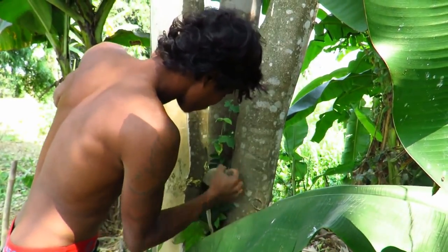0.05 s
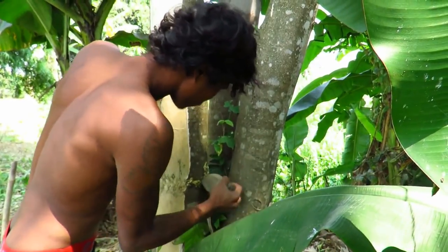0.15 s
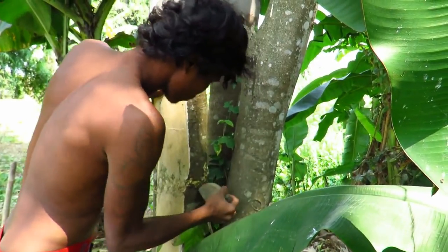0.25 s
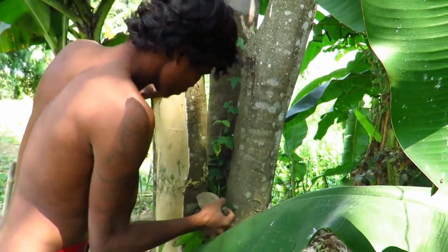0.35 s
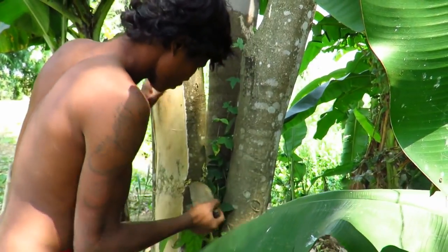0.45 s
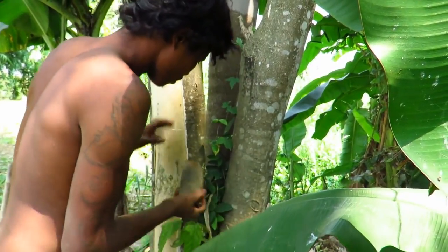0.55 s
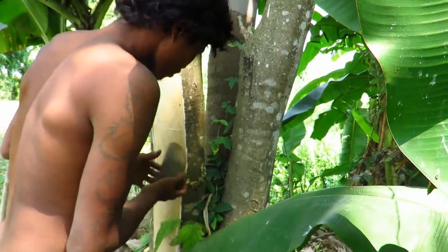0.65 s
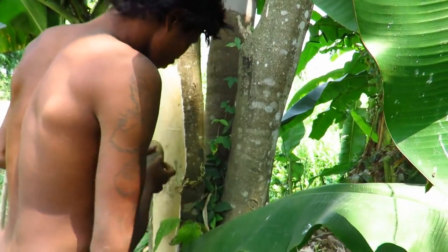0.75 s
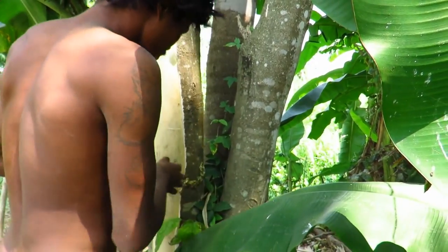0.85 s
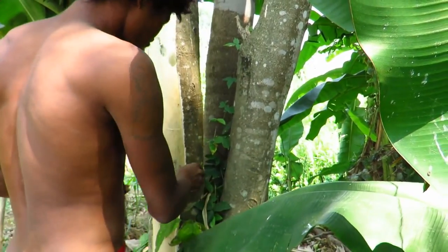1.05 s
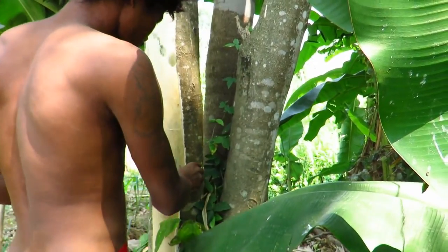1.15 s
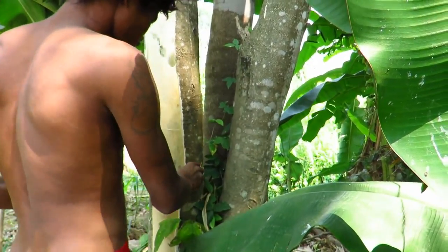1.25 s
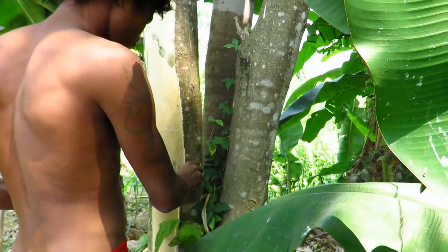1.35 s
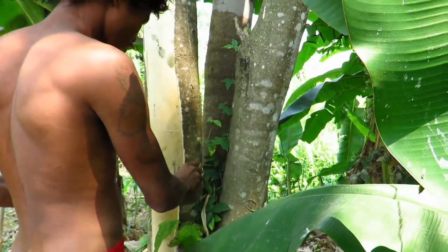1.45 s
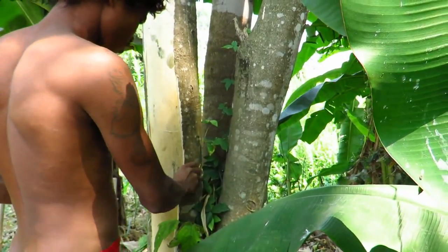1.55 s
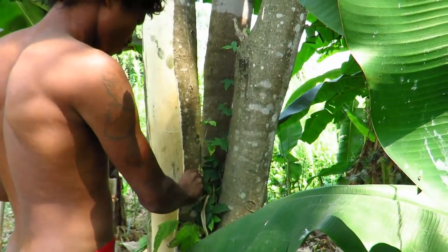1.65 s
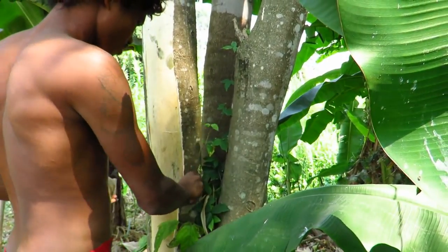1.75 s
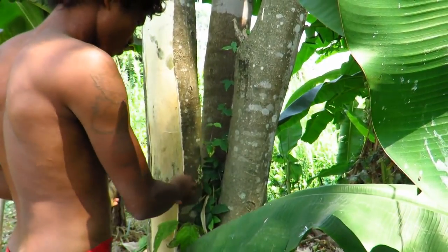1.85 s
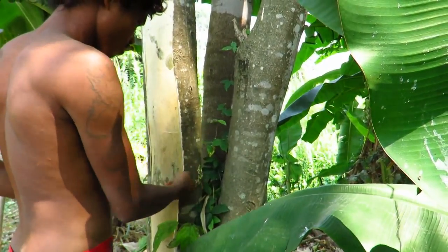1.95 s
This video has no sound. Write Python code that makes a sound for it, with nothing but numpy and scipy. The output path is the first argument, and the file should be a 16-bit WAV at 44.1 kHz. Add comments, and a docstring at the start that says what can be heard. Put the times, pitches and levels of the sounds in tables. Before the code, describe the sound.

Close to the microphone, one loud blunt chop thuds on wood and echoes briefly off trees; quieter gritty bark scraping with tiny snaps follows, then only hushed leaves, thin insect hiss and a light rustle.

```python
"""One blunt blow on a slim trunk in a forest, heard close up: decaying tones ring and noise cracks.
Then a hand scrapes and peels the bark in short pulls: grainy noise with small ringing snaps.
Echo off the trees follows the crack. Behind it all lie soft leaf noise, a band of insect song and
one bright rustle of leaves. A limiter turns everything down for the blow and then lets go."""
import sys
import numpy as np
from scipy import signal
from scipy.fft import rfft, irfft, next_fast_len
from scipy.io import wavfile
from scipy.ndimage import uniform_filter1d, minimum_filter1d

SR = 44100
rng = np.random.default_rng(int(sys.argv[2]) if len(sys.argv) > 2 else 0)


def store_pcm(level_fs):
    """Save levels as 16-bit WAV."""
    pcm = np.round(np.clip(level_fs, -1, 1) * 32767).astype(np.int16)
    wavfile.write(sys.argv[1], SR, np.atleast_2d(pcm).T)


N = 85995

# All levels are relative, ahead of the limiter; t60 is the time to fade by 60 dB.
# The blow and small rebounds of the tool. Each row: start in seconds, level in dB, contact time in seconds.
BLOWS = [(0.2077, 7.5, 0.0017), (0.2226, -15, 0.00063), (0.2373, -10.5, 0.0056), (0.2556, -11.5, 0.0053)]
# Ringing tones of the trunk. Each row: frequency in Hz, level in dB, t60 in seconds.
TRUNK_TONES = [(80.7, -11, 0.21), (100, -20, 0.13), (151.1, -25.5, .5), (197, -5, 0.19), (299.4, 9, 0.06),
               (249.7, 6, 0.084), (341, -18, 0.1), (396, -5, 0.055), (584.5, -6, 0.087), (638.8, -2, 0.066),
               (787, -2, 0.031), (1080, -23, 0.097), (1584, 0, 0.019), (3580, -19, .02)]
# Colour of the splintering fibres. Each row: frequency in Hz, level in dB per Hz.
CRACK_COLOUR = [(590, -33), (1000, 4), (2010, -8.5), (3700, -5.5), (6410, -22), (11200, -12),
                (14600, -23.5), (15500, -22)]
# Hand on bark. Each row: time in seconds, scrape level in dB, low rub level in dB, treble level in dB.
SCRAPE_LEVELS = [(0.44, -73, -64, -86), (0.476, -56.5, -56, -81), (0.506, -44, -52, -57),
                 (0.528, -46.5, -49, -60), (0.548, -42.5, -45, -60), (0.556, -45, -50, -58),
                 (0.624, -45.5, -50, -53), (0.632, -43.5, -33, -49), (0.644, -36, -43, -52),
                 (0.672, -36, -37.5, -45), (0.696, -39.5, -55, -51), (0.702, -38.5, -45.5, -50),
                 (0.722, -53.5, -51, -60), (0.74, -46.5, -49, -58), (0.76, -42, -82, -56),
                 (0.766, -59, -75, -60), (0.768, -52, -77, -59), (0.79, -45.5, -47, -60),
                 (0.826, -54.5, -61, -66), (0.846, -37, -47, -48), (0.858, -49, -45, -59),
                 (0.864, -47.5, -52, -57), (0.894, -51.5, -57, -62), (0.904, -54, -84, -64),
                 (0.926, -60, -76, -71), (0.93, -65, -90, -74), (0.948, -50.5, -51, -63),
                 (0.964, -51, -56, -62), (0.986, -57, -82, -70), (1.02, -70, -50.5, -76)]
# Colour of the scraped fibres. Each row: frequency in Hz, level in dB per Hz.
FIBRE_COLOUR = [(710, -11), (1200, -4.5), (1360, -7), (1800, -4.5), (2070, -5), (2730, -1.5), (7500, -12.5),
                (9750, -52), (16500, -120)]
# Colour of the low rub. Each row: frequency in Hz, level in dB per Hz.
RUB_COLOUR = [(180, -45), (300, 1.5), (393, -3), (659, 4.5), (938, 0), (1800, -1), (2340, -38),
              (3960, -120)]
# Colour of the scrape's treble. Each row: frequency in Hz, level in dB per Hz.
TREBLE_COLOUR = [(4120, -25), (7000, -11), (10100, -9), (12500, -10.5), (15300, -25)]
# Bark snaps and low thumps of loose bark.
# Each row: start in seconds, level in dB, ring in Hz, t60 in seconds, share of broad crackle from 0 to 1.
SNAPS = [(0.5054, -62, 2600, 0.018, 0.5), (.533, -30.5, 1000, 0.012, .1), (0.545, -24.5, 1050, .022, 0.2),
         (0.6, -39.5, 5900, 0.024, 0), (0.603, -34, 990, .01, 0), (0.6313, -18.5, 830, 0.024, 1),
         (.636, -30, 194, 0.059, 0), (.638, -37.5, 303, 0.085, 0), (0.653, -39, 2020, 0.0053, .6),
         (0.662, -28, 2900, 0.044, 0.35), (0.674, -34, 2900, 0.048, 0), (.703, -22, 2940, 0.009, 0.2),
         (0.7483, -37, 2920, 0.012, 0.2), (0.8407, -23, 3410, 0.0067, 0.04),
         (0.846, -30.5, 4750, 0.023, 0.4), (.847, -33, 2864, 0.063, 0), (0.853, -22.5, 3260, 0.013, 0.05),
         (0.9455, -33, 2680, 0.014, 0.3), (.96, -38, 2210, 0.029, .4)]
# Echo off the trees. Each row: frequency in Hz, t60 in seconds.
ECHO_FADE = [(100, 0.29), (300, 0.18), (1000, 0.22), (4000, 0.36), (12000, 0.11)]
# Steady leaf noise. Each row: frequency in Hz, level in dB per Hz.
LEAF_COLOUR = [(15, -22), (25, 5), (48, 3), (144, -0.5), (297, 4), (389, 2), (782, -3.5), (1050, -4),
               (1270, -7.5), (1900, -10), (3500, -14), (5430, -19), (7910, -25), (13500, -31), (15000, -44),
               (15500, -44)]
# A bright rustle of leaves. Each row: time in seconds, level in dB.
RUSTLE_LEVEL = [(1.62, -68), (1.68, -59), (1.738, -51.5), (1.772, -59), (1.792, -62), (1.82, -65)]
# Colour of that rustle. Each row: frequency in Hz, level in dB per Hz.
RUSTLE_COLOUR = [(590, -46), (1000, -38), (1460, 7.5), (1740, -0.5), (2290, -6), (5060, -10), (6290, -9),
                 (15600, -17.5)]
# How alike left and right are, near the listener. Each row: frequency in Hz, likeness from -1 to 1.
NEAR_ALIKE = [(60, 0.63), (240, 0.96), (950, 1), (3770, 1), (15000, 0.39)]
# How alike left and right are, in the forest. Each row: frequency in Hz, likeness from -1 to 1.
FOREST_ALIKE = [(60, 1), (130, 0.23), (290, -0.68), (640, -0.0097), (1410, 0.4), (3100, 0.63), (6820, 0.65),
                (15000, -0.17)]

RISE_S = 0.0035  # how gradually each ring starts
WANDER = 0.008  # random phase step of each tone, radians per sample
# The tool settles on the wood and damps the ring: when, how gradually, and by how much
SETTLE_S, SETTLE_WIDTH_S, SETTLE_DB = 0.0112, 0.0008, -15
CRACK_S, CRACK_WIDTH_S, CRACK_DB = 0.21, 0.0017, -9.5
CRACK_TAIL_DB, CRACK_T60 = -26, 0.08  # tail level against the crack's peak; t60 in seconds
GRAINS_PER_S, GRAIN_DB, GRAIN_S = 2000, 3, 0.00062  # mean rate, unevenness of size, fade time
HISS = 0.95  # hiss against grains at 1
SNAP_RISE_S, SNAP_TOP_HZ = 0.00036, 12000
ECHO_DB, ECHO_DELAY = -26, 400  # delay in samples
LEAVES_DB, INSECT_DB = -48, -60
INSECT_HZ, INSECT_WIDTH_HZ = 6710, 790  # centre, and distance from it where gain is exp(-2)
BASS_CUT_HZ, TREBLE_CUT_HZ, TOP_HZ = 61.5, 15500, 15700
CEILING_DB, AHEAD_S = -1, 0.009  # limiter threshold and look-ahead
FAST_DB_PER_S, SLOW_SHARE, SLOW_DB_PER_S = 450, 0.5, 20  # how the limiter lets go


def trunk_ring():
    """Each blow rings the trunk unsteadily; a longer contact leaves the high tones out."""
    out = np.zeros(N + SR)
    t = np.arange(SR // 2) / SR
    settling = SETTLE_DB * (1 + np.tanh((t - SETTLE_S) / SETTLE_WIDTH_S)) / 2
    rise = 1 - np.exp(-t / RISE_S)
    for start_s, blow_db, contact_s in BLOWS:
        ring = np.zeros(len(t))
        for hz, tone_db, t60 in TRUNK_TONES:
            wander = np.cumsum(rng.normal(0, WANDER, len(t)))
            tone = np.sin(2 * np.pi * hz * t + wander)
            softness = 1 + (hz * contact_s) ** 4
            ring += amp(tone_db - 60 * t / t60) * tone / softness
        start = round(start_s * SR)
        out[start:start + len(t)] += amp(blow_db + settling) * ring * rise
    return out[:N] * amp(0) * np.array([[0.0], [0.0]]) + out[:N] * amp([[-0.5], [0.5]])


def fibre_crack():
    """The hard blow cracks fibres: a short swell of noise with a quieter fading tail."""
    since = np.arange(N) / SR - CRACK_S
    burst = np.exp(-(since / CRACK_WIDTH_S) ** 2 / 2)
    tail = (since > 0) * amp(CRACK_TAIL_DB - 60 * np.abs(since) / CRACK_T60)
    noise = spread(rng.standard_normal((2, N)), lambda hz: amp(along(CRACK_COLOUR, hz)), NEAR_ALIKE)
    return amp(CRACK_DB) * (burst + tail) * noise


def bark_scrape():
    """Dry bark slips in tiny grains; fibres, low rub and treble each follow their own level."""
    out = np.zeros((2, N))
    for gain, colour in zip(curves(SCRAPE_LEVELS), (FIBRE_COLOUR, RUB_COLOUR, TREBLE_COLOUR)):
        out += gain * spread(grains(), lambda hz: amp(along(colour, hz)), NEAR_ALIKE)
    return out


def bark_snaps():
    """Each snap is a brief unsteady ring mixed with broad crackle, the same in both ears."""
    snaps = np.zeros(N)
    t = np.arange(SR // 20) / SR
    rise = 1 - np.exp(-t / SNAP_RISE_S)
    for start_s, db, hz, t60, crackle_share in SNAPS:
        wander = np.cumsum(rng.normal(0, hz / 25000, len(t)))
        ring = np.sin(2 * np.pi * hz * t + wander)
        crackle = 0.57 * rng.standard_normal(len(t))
        sound = (1 - crackle_share) * ring + crackle_share * crackle
        start = round(start_s * SR)
        snaps[start:start + len(t)] += amp(db - 60 * t / t60) * sound * rise
    return filtered(snaps, lambda hz: 1 / (1 + (hz / SNAP_TOP_HZ) ** 8))


def tree_echo(x):
    """The trees' answer is a tail of noise in which each frequency dies at its own speed."""
    own = 0.3 * rng.standard_normal((2, SR // 2))
    shared = rng.standard_normal(SR // 2)
    hz, t, z = signal.stft(own + shared, SR, nperseg=256)
    fade = amp(-60 * t / along(ECHO_FADE, hz)[:, None])
    tail = signal.istft(z * fade, SR, nperseg=256)[1]
    tail = tail / np.linalg.norm(tail[0])
    delayed = np.pad(x.mean(0), (ECHO_DELAY, 0))[None]
    return amp(ECHO_DB) * signal.fftconvolve(delayed, tail, axes=1)[:, :N]


def leaf_rustle():
    """One bright rustle: many small slips, swelling and fading."""
    level = curves(RUSTLE_LEVEL)[0]
    return level * spread(grains(), lambda hz: amp(along(RUSTLE_COLOUR, hz)), FOREST_ALIKE)


def insects():
    """Many singers blend into one uneven noise band around a single pitch."""
    band = lambda hz: np.exp(-2 * ((hz - INSECT_HZ) / INSECT_WIDTH_HZ) ** 2)
    return amp(INSECT_DB) * spread(patchy(patchy_db=2.5), band, FOREST_ALIKE)


def leaves():
    """Many leaves together make soft, slightly uneven noise."""
    colour = lambda hz: amp(along(LEAF_COLOUR, hz))
    return amp(LEAVES_DB) * spread(patchy(patchy_db=1.5), colour, FOREST_ALIKE)


def grains():
    """Tiny slips of uneven size, each a short puff of noise, over hiss."""
    happens = rng.random(N) < GRAINS_PER_S / SR
    slips = happens * amp(GRAIN_DB * rng.standard_normal(N))
    puffs = signal.lfilter([1], [1, -np.exp(-1 / (GRAIN_S * SR))], slips)
    hiss = unit(patchy(patchy_db=3, size=128))
    return unit(puffs * rng.standard_normal((2, N))) + HISS * hiss


def patchy(patchy_db, size=512):
    """Two noises sharing patches of random gain across time and frequency."""
    z = signal.stft(rng.standard_normal((2, N)), nperseg=size)[2]
    field = uniform_filter1d(rng.standard_normal(z.shape[1:]), 5, 0)
    field = uniform_filter1d(field, 8, 1)
    return signal.istft(z * amp(patchy_db * unit(field)), nperseg=size)[1][:, :N]


def spread(pair, gain, alike):
    """Colour two unrelated signals and mix them to left and right, with an rms of 1."""
    turn = lambda hz: np.arccos(np.clip(along(alike, hz), -1, 1)) / 2
    mid, side = filtered(pair, lambda hz: gain(hz) * [np.cos(turn(hz)), np.sin(turn(hz))])
    return unit(np.array([mid + side, mid - side]))


def filtered(x, response):
    """Multiply the spectrum of x by a response that depends on frequency."""
    m = next_fast_len(N + SR // 2)
    return irfft(rfft(x, m) * response(np.fft.rfftfreq(m, 1 / SR)), m)[..., :N]


def curves(rows):
    """Gain per sample for each dB column; -120 dB outside the rows."""
    s, *columns = np.transpose(rows)
    t = np.arange(N) / SR
    return [amp(np.interp(t, s, column, left=-120, right=-120)) for column in columns]


def along(points, hz):
    """Read a value between (Hz, value) points on a log frequency axis."""
    f, v = np.transpose(points)
    return np.interp(np.log(hz + 1), np.log(f + 1), v)


def unit(x):
    """Scale to an rms of 1."""
    return x / np.sqrt(np.mean(x ** 2) + 1e-20)


def amp(db):
    """Turn dB into a gain."""
    return 10 ** (np.asarray(db) / 20)


def scene():
    """Add the blow, the bark, the echo of the blow and the forest."""
    blow = trunk_ring() + fibre_crack()
    bark = bark_scrape() + bark_snaps()
    forest = leaf_rustle() + insects() + leaves()
    return blow + bark + tree_echo(blow) + forest


def record(dry):
    """Bass cut; a look-ahead limiter lets go fast at first, then slowly; then the treble cut."""
    dry = filtered(dry, lambda hz: (1j * hz / (1j * hz + BASS_CUT_HZ)) ** 2)
    t = np.arange(N) / SR
    ahead = round(AHEAD_S * SR)
    peak_db = 20 * np.log10(np.abs(dry).max(0) + 1e-9)
    over_db = np.clip(peak_db - CEILING_DB, 0, None)
    # the highest excess within the look-ahead
    over_db = -minimum_filter1d(-over_db, ahead, origin=-(ahead // 2))
    let_go = lambda db, rate: np.maximum.accumulate(db + rate * t) - rate * t
    fast_db = let_go(over_db, FAST_DB_PER_S)
    slow_db = let_go(SLOW_SHARE * over_db, SLOW_DB_PER_S)
    cut_db = uniform_filter1d(np.maximum(fast_db, slow_db), size=80)
    treble_cut = lambda hz: (hz < TOP_HZ) / (1 + (hz / TREBLE_CUT_HZ) ** 40)
    return filtered(dry * amp(-cut_db), treble_cut)


dry = scene()
out = record(dry)
store_pcm(out)
```